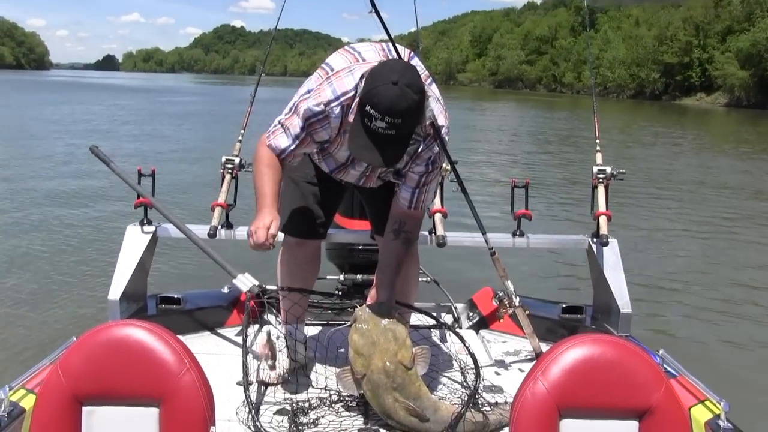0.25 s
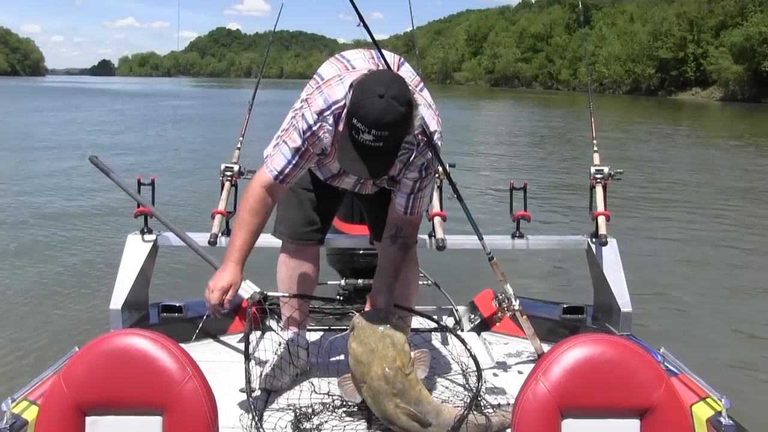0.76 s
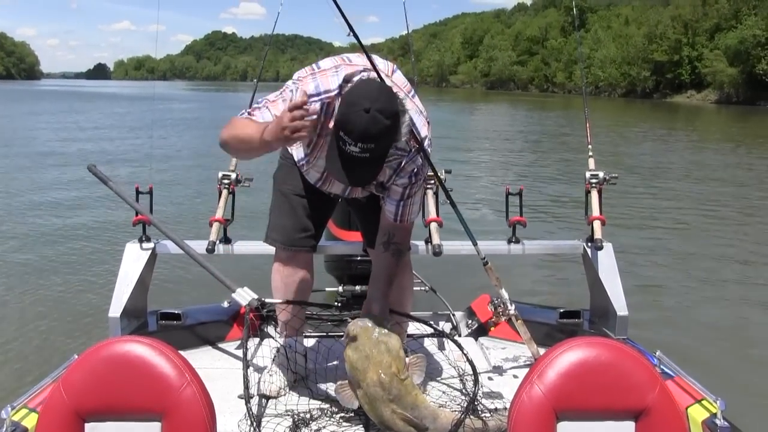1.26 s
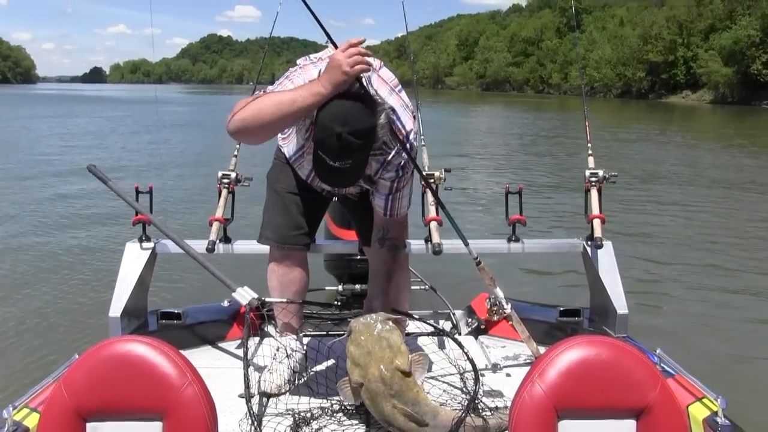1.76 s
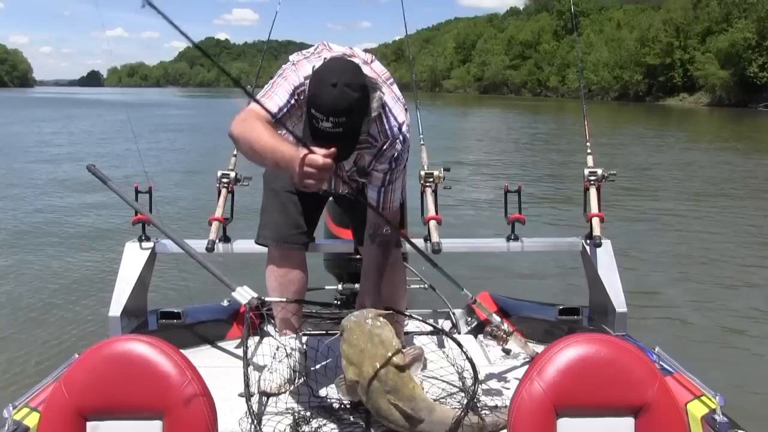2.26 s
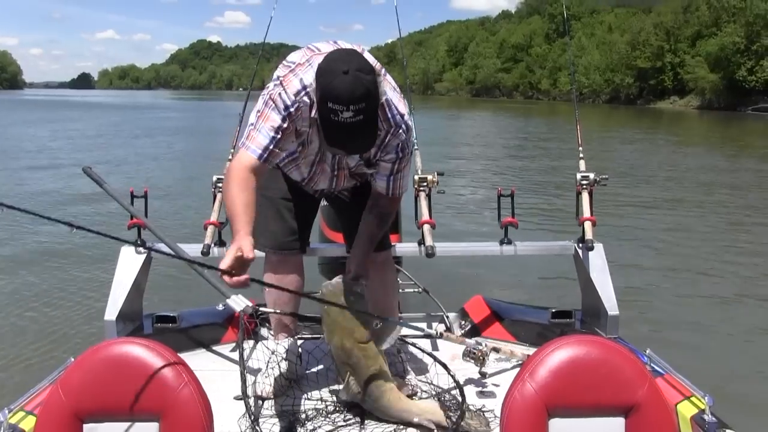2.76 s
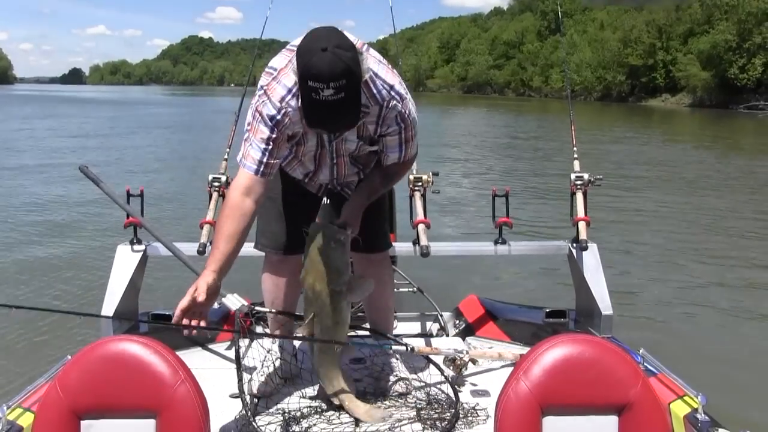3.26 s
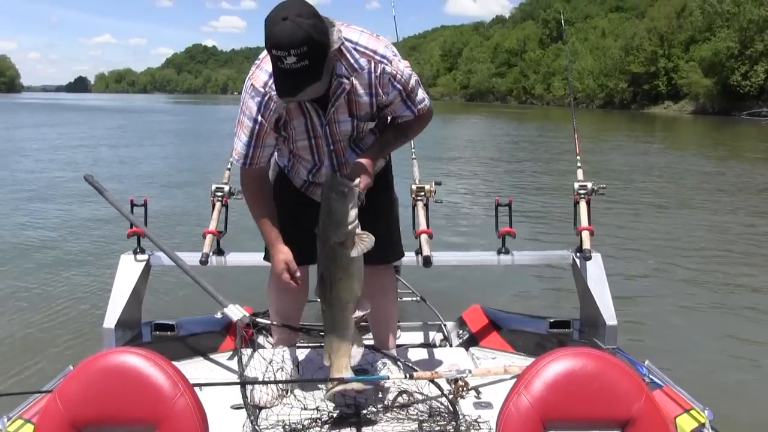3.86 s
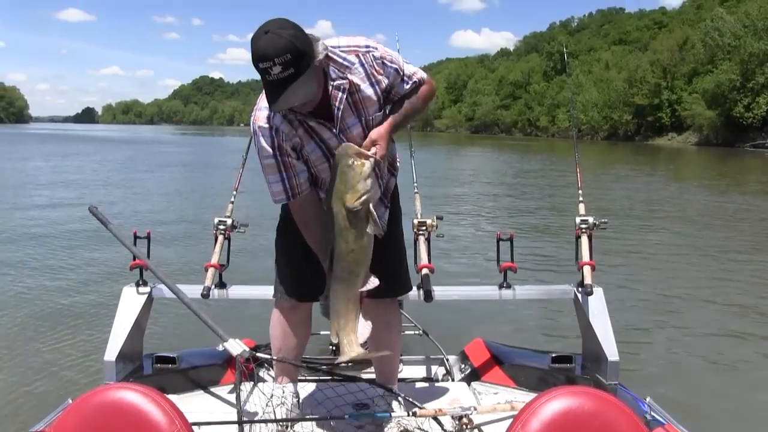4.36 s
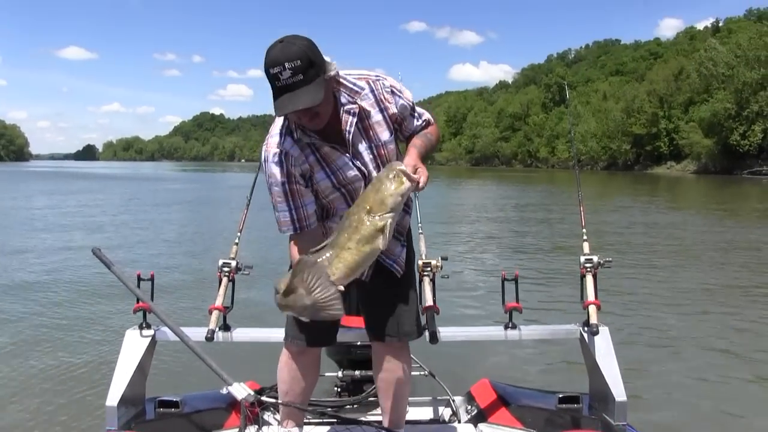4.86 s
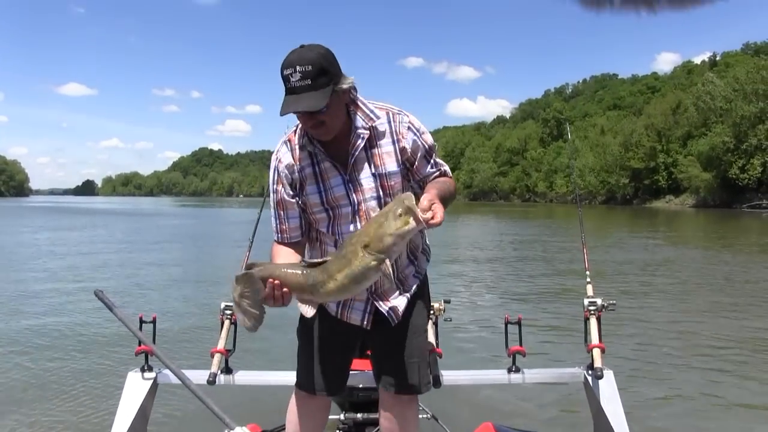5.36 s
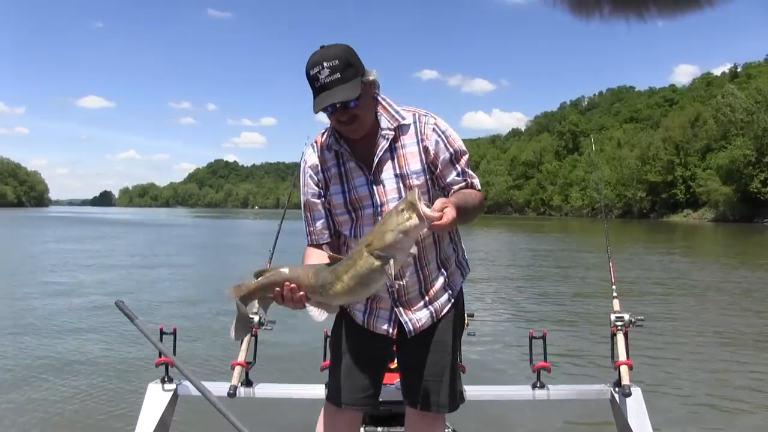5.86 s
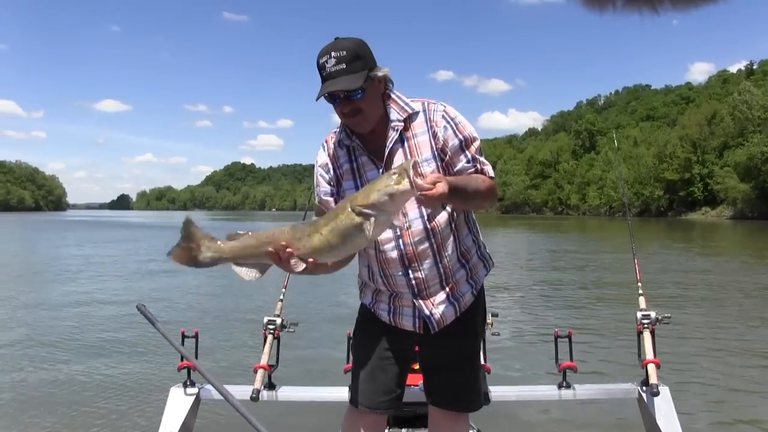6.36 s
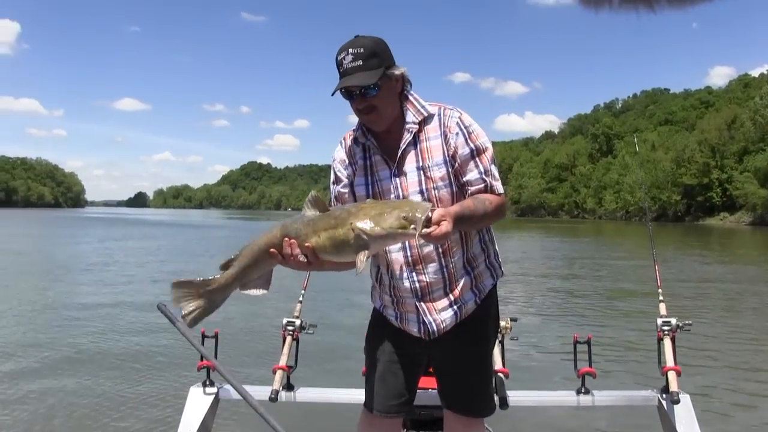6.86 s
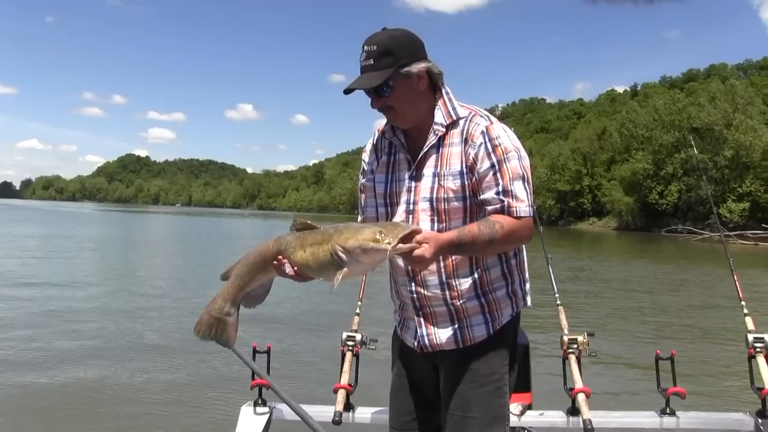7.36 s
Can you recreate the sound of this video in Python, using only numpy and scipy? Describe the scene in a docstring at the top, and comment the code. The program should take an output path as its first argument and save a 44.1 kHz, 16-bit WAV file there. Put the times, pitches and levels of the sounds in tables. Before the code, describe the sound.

On a small boat, a steel tool clinks down, a rod butt knocks and scrapes, and a net hoop clacks over lapping water and birdsong.

```python
"""River wash and far twitter come first, then a steel tool clinks down on the deck of a small boat.
An angler clears the deck and lifts a catfish out of the net: a rod butt knocks and scrapes out of its
holder, the net's hoop clacks, its mesh rustles. Songbirds call from the wooded bank; wind buffets.
Blows are decaying sine modes plus banded noise; birds are swept sines with an echo tail; river, wind,
mesh and scrape are coloured noise with fluctuating level."""
import sys
import numpy as np
from scipy import signal
from scipy.fft import rfft, irfft, next_fast_len
from scipy.io import wavfile
from scipy.ndimage import uniform_filter1d, map_coordinates

SR = 44100
rng = np.random.default_rng(int(sys.argv[2]) if len(sys.argv) > 2 else 0)


def generate_wav(sig):
    """Save sig (samples, or channels by samples) to the path in sys.argv[1] as 16-bit PCM at SR."""
    pcm = np.round(np.clip(np.atleast_2d(sig).T, -1, 1) * 32767).astype(np.int16)
    wavfile.write(sys.argv[1], SR, pcm)


N = 335711


def amp(db):
    """Decibels to gain."""
    return 10 ** (np.asarray(db) / 20)


def unit(x):
    """Scaled to rms 1."""
    return x / np.sqrt(np.mean(x ** 2) + 1e-20)


def along(points, hz):
    """Values of (f/Hz, value) points, interpolated on a log frequency axis."""
    f, v = np.transpose(points)
    return np.interp(np.log(hz + 1), np.log(f + 1), v)


def level(rows):
    """Gain per sample from (t/s, level/dB) rows, -120 dB outside them."""
    return amp(np.interp(np.arange(N) / SR, *np.transpose(rows), left=-120, right=-120))


def wobble(knots_per_s, size=N):
    """Smooth random curve through normally distributed knots."""
    knots = rng.standard_normal(int(size * knots_per_s / SR) + 4)
    return map_coordinates(knots, [np.arange(size) * knots_per_s / SR])


def filtered(x, response):
    """x times a response of frequency."""
    n = x.shape[-1]
    m = next_fast_len(n + 8192)
    return irfft(rfft(x, m) * response(np.fft.rfftfreq(m, 1 / SR)), m)[..., :n]


def noise(colour, size=N):
    """Two independent noises of the given colour, rms 1 over the pair."""
    white = rng.standard_normal((2, size))
    return unit(filtered(white, lambda hz: amp(along(colour, hz))))


def stereo(pair, side_db):
    """Left and right from a middle and a side signal."""
    mid, side = pair[0], amp(side_db) * pair[1]
    return np.array([mid + side, mid - side])


def add(track, start_s, sound):
    """Mix a sound into the track, cut at the track's end."""
    part = track[:, round(start_s * SR):][:, :sound.shape[1]]
    part += sound[:, :part.shape[1]]


def swells(rows, attack_s, sag_db_per_s, release_s):
    """Gain per sample of (t, length, level) rows: rise, steady sag, then a release with t60 release_s."""
    gain = np.zeros(N)
    for start_s, length_s, db in rows:
        t = np.maximum(np.arange(N) / SR - start_s, 0)
        release_db = 60 * np.maximum(t - length_s, 0) / release_s
        gain += np.minimum(t / attack_s, 1) * amp(db - sag_db_per_s * t - release_db)
    return gain


def dying(x, decay, stretch=1):
    """Seven bands of x each swell quickly and die with their own t60 times stretch."""
    t = np.arange(x.shape[1]) / SR
    hz, spectrum = np.fft.rfftfreq(len(t), 1 / SR), rfft(x)
    centres = np.geomspace(100, 14000, 7)
    out = np.zeros_like(x)
    for centre, weights in zip(centres, np.eye(len(centres))):
        band = irfft(spectrum * along(np.c_[centres, weights], hz), len(t))
        onset = 1 - np.exp(-2 * t * min(centre, SR / 20))
        out += band * amp(-60 * t / (stretch * along(decay, centre))) * onset
    return out


# river colour: f/Hz, level/dB
RIVER_COLOUR = [(13, -39), (22, -21.5), (59, 1), (128, -2.5), (174, -8), (211, -4), (229, -4.5), (278, -9),
                (524, -13.5), (1040, -19), (1860, -24), (4030, -27), (5460, -31), (7190, -33), (16000, -40)]
# left-right correlation: f/Hz, likeness (1 = identical)
RIVER_LIKENESS = [(60, 0.41), (180, 0.8), (550, 0.26), (1650, 0.47), (4970, 0.56), (15000, 0.5)]


def river(gain_db, lap_db, hiss_db):
    """Ripples and far leaves: hiss above a lapping low wash, each with its own level fluctuation."""
    pair = noise(RIVER_COLOUR)
    low = filtered(pair, lambda hz: 1 / (1 + (hz / 450) ** 4))
    hiss = (pair - low) * amp(hiss_db * wobble(5))
    pair = hiss + low * amp(lap_db * wobble(14))

    def mid_side(hz):
        # cos^2 - sin^2 of this angle equals the likeness
        angle = np.arccos(np.clip(along(RIVER_LIKENESS, hz), -1, 1)) / 2
        return np.array([np.cos(angle), np.sin(angle)])

    return amp(gain_db) * stereo(filtered(pair, mid_side), 0)


# gusts at the microphone, before gain: t/s, length/s, level/dB
GUST_ROWS = [(3.46, 0.66, -46.5), (4.55, 0.81, -42), (5.75, 0.033, -41), (5.91, 0.035, -35),
             (6.04, 0.49, -33.5), (6.77, 0.09, -43.5), (6.87, 0.48, -36.5), (7.57, .05, -48)]
# buffeting colour: f/Hz, level/dB
BUFFET_COLOUR = [(13, -37), (22, -24), (76, 0), (119, -1), (255, -18.5), (331, -29), (468, -61), (508, -55),
                 (600, -50), (780, -73), (1320, -120)]
GUST_ATTACK_S, GUST_SAG_DB_PER_S, GUST_RELEASE_T60_S, LULL_DB = 0.01, 11.5, 0.34, -56


def wind(gain_db, lump_db, left_db, side_db):
    """Eddies buffet the microphone: lumpy low noise, louder left, with a lull floor from the first gust on."""
    eddies = unit(noise(BUFFET_COLOUR) * amp(lump_db * wobble(30)))
    lull = amp(LULL_DB) * (np.arange(N) / SR > GUST_ROWS[0][0])
    strength = lull + swells(GUST_ROWS, GUST_ATTACK_S, GUST_SAG_DB_PER_S, GUST_RELEASE_T60_S)
    balance_db = np.array([[left_db], [-left_db]])
    return stereo(eddies, side_db) * strength * amp(gain_db + balance_db)


def chorus(gain_db, patchy_db):
    """Far birds blur into twitter: noise with random time-frequency patches of level."""
    # f/Hz, level/dB
    colour = [(1500, -27.5), (2600, 6.5), (4200, -15.0), (5500, -14), (7300, -7), (9000, -24)]
    _, _, z = signal.stft(noise(colour), SR, nperseg=512)
    field = uniform_filter1d(rng.standard_normal(z.shape[1:]), size=5, axis=0)
    field = uniform_filter1d(field, size=14, axis=1)
    twitter = signal.istft(z * amp(patchy_db * unit(field)), nperseg=512)[1][:, :N]
    return amp(gain_db) * stereo(unit(twitter), -12.5)


QUAVER_AT_5KHZ = 0.0194  # random pitch swing as a share of pitch; grows with pitch


def notes(rows, depth, bend, flutter_db, rising=False):
    """Sines sweep depth (share of top pitch) up or down; bend > 1 lingers near the top; higher quavers more."""
    track = np.zeros((2, N))
    for start_s, length_s, top_hz, db in rows:
        u = np.linspace(0, 1, int(length_s * SR))
        below_top = 1 - u if rising else u
        quaver = QUAVER_AT_5KHZ * top_hz / 5000 * wobble(450, len(u))
        pitch_hz = top_hz * (1 - depth * below_top ** bend) * (1 + quaver)
        swell = signal.windows.tukey(len(u), .25) * amp(db + flutter_db * wobble(140, len(u)))
        tone = swell * np.sin(2 * np.pi * np.cumsum(pitch_hz) / SR)
        add(track, start_s, np.tile(tone, (2, 1)))
    return track


# songbird slurs up to a top pitch, before gain: t/s, length/s, top f/Hz, level/dB
RISING_SLURS = [(.73, .03, 2500, -64), (4.905, 0.052, 5270, -48.5), (5.43, 0.048, 5500, -51),
                (5.598, .045, 6150, -51), (5.88, 0.059, 5550, -48.5), (6.105, .125, 6040, -48.5),
                (6.36, .14, 6180, -47.5), (7.505, 0.046, 5250, -50)]
# songbird slurs down from a top pitch, before gain: t/s, length/s, top f/Hz, level/dB
FALLING_SLURS = [(2.894, 0.042, 4260, -50), (4.832, 0.051, 4430, -53), (5.02, 0.097, 4780, -54),
                 (5.15, 0.078, 3095, -54.5), (5.34, .05, 4700, -52), (5.555, 0.1, 7470, -55),
                 (5.56, 0.079, 4750, -53), (5.625, 0.036, 5500, -47.5), (5.786, 0.062, 8000, -51),
                 (5.908, 0.038, 5130, -51), (6.044, 0.035, 5170, -46), (6.301, 0.037, 5180, -46),
                 (6.585, .125, 5500, -46), (7.407, 0.076, 4580, -57), (7.516, 0.039, 4270, -59)]
# nearly level whistled notes, some low, before gain: t/s, length/s, top f/Hz, level/dB
WHISTLE_NOTES = [(4.0, 0.123, 3500, -53.5), (4.745, .04, 4240, -56), (5.26, 0.041, 4270, -53),
                 (5.57, 0.2, 1810, -62), (5.645, 0.057, 4500, -54), (6.22, .12, 1770, -63),
                 (6.72, .17, 1796, -66)]
RISE_DEPTH, RISE_BEND = 0.28, 3
FALL_DEPTH, FALL_BEND = .3, 1.5
WHISTLE_SAG = .025  # share of pitch lost


def birds(gain_db, flutter_db):
    """Rising and falling slurs, plus whistled notes that sag slightly in pitch."""
    slurs = notes(RISING_SLURS, RISE_DEPTH, RISE_BEND, flutter_db, rising=True)
    slurs += notes(FALLING_SLURS, FALL_DEPTH, FALL_BEND, flutter_db)
    return amp(gain_db) * (slurs + notes(WHISTLE_NOTES, WHISTLE_SAG, 1, flutter_db))


# echo decay before stretch: f/Hz, t60/s
BANK_T60 = [(500, 0.65), (4000, 0.84), (9000, 0.3)]


def bank(x, stretch):
    """Trees on the bank scatter a soft tail: convolution with dying noise."""
    tail = stereo(dying(rng.standard_normal((2, SR)), BANK_T60, stretch), -1.52)
    return signal.fftconvolve(x, tail / np.linalg.norm(tail[0]), axes=1)[:, :N]


# pulls on the wet mesh and the fish's skin, before gain: t/s, length/s, level/dB
MESH_PULLS = [(1.93, 0.043, -57.5), (3.46, .28, -52), (4.52, 0.069, -49), (4.68, 0.32, -59.5),
              (5.1, .22, -67), (6.38, 0.046, -57)]
# rustle colour: f/Hz, level/dB
MESH_SPECTRUM = [(500, 3), (2000, 0.5), (7000, -1), (10000, -6.5), (15000, -4.5)]
PULL_ATTACK_S, PULL_SAG_DB_PER_S, PULL_RELEASE_T60_S = 0.01, 12, 0.3


def mesh(gain_db, clump_db, grain_db):
    """Wet netting slips over the fish: noise with slow clumps and fast grains of level."""
    grains = unit(noise(MESH_SPECTRUM) * amp(clump_db * wobble(45) + grain_db * wobble(830)))
    pulls = swells(MESH_PULLS, PULL_ATTACK_S, PULL_SAG_DB_PER_S, PULL_RELEASE_T60_S)
    return amp(gain_db) * pulls * stereo(grains, -4.5)


# small taps of tackle, and the sharp crack of the rod butt's hardest knock, before gain:
# t/s, level/dB, centre f/Hz, t60/s
TAPS_AND_CRACK = [(0.566, -46, 1324, .038), (.648, -28.5, 1040, 0.044), (1.316, -40, 970, 0.023),
                  (1.363, -44, 960, 0.11), (1.398, -48, 3470, .03), (1.582, -24, 1050, 0.013),
                  (1.824, -41, 1000, 0.057), (2.042, -41, 1660, 0.053), (2.261, -26, 11000, 0.02),
                  (3.467, -40, 5000, 0.12), (3.831, -31, 895, 0.027), (4.347, -36, 4190, 0.02),
                  (5.279, -39.5, 2920, .046), (5.523, -37, 2650, 0.013), (5.718, -39, 1140, 0.021),
                  (5.821, -38, 1010, 0.048)]
TAP_OCTAVES_AT_1KHZ, TAP_WIDENING_POWER = 0.37, 1


def taps(gain_db, side_db):
    """Taps and a crack: quickly damped noise humps, broader in octaves the higher they lie."""
    track, t = np.zeros((2, N)), np.arange(SR // 6) / SR
    for start_s, db, centre_hz, t60_s in TAPS_AND_CRACK:
        octaves = TAP_OCTAVES_AT_1KHZ * (centre_hz / 1000) ** TAP_WIDENING_POWER

        def hump(hz):
            return 1 / (1 + (np.log2((hz + 1) / centre_hz) / octaves) ** 2) ** 1.45

        tap = unit(filtered(rng.standard_normal((2, len(t))), hump))
        tap *= amp(-60 * t / t60_s) * (1 - np.exp(-t / 0.00029))
        add(track, start_s, amp(db + gain_db) * stereo(tap, side_db))
    return track


# butt slides out of the holder, before gain: t/s, level/dB
SCRAPE_LEVEL = [(2.32, -34.5), (2.39, -52), (2.43, -38.5), (2.47, -43.5), (2.52, -36), (2.565, -33),
                (2.60, -56)]
# scrape colour: f/Hz, level/dB
SCRAPE_SPECTRUM = [(100, -22), (250, -5), (420, 2.5), (650, 1), (1050, -7.5), (1700, -21.5), (2800, -19),
                   (8000, -42)]


def scrape(gain_db, slip_db):
    """The rod's grip sticks and slips along the holder's tube: noise with rapid random level."""
    slips = unit(noise(SCRAPE_SPECTRUM) * amp(slip_db * wobble(220)))
    return amp(gain_db) * level(SCRAPE_LEVEL) * stereo(slips, -10)


# clatter decay before stretch: f/Hz, t60/s
HULL_T60 = [(100, 0.22), (400, 0.1), (1000, 0.067), (3000, 0.068), (7000, 0.041), (15000, 0.049)]


def struck(hits, modes, colour, stretch, ring_db, heft, chatter_db, spread_hz, side_db, gain_db):
    """Every blow rings the object's own modes and a dense, short clatter of the hull."""
    track, t = np.zeros((2, N)), np.arange(SR // 3) / SR
    mode_hz, mode_db, t60_s = np.transpose(modes)[:, :, None]
    heaviest_db = max(hit[1] for hit in hits)
    for start_s, db, bright_db in hits:
        # brightness tilt: more dB per octave sounds brighter
        tilted = [(hz, d + bright_db * np.log2(hz)) for hz, d in colour]
        # loose parts chatter while the blow dies away
        clatter = dying(noise(tilted, len(t)), HULL_T60, stretch)
        clatter = clatter * amp(chatter_db * wobble(531, len(t)))
        scatter_db = 2 * rng.standard_normal(mode_hz.shape)
        strength = amp(mode_db + bright_db * np.log2(mode_hz) + scatter_db)
        phase = rng.uniform(0, 2 * np.pi, (2, len(modes), 1))
        # shifting contact: phase random walk widens each mode's line
        walk = np.cumsum(rng.standard_normal((len(modes), len(t))), axis=1)
        phase = phase + walk * np.sqrt(2 * np.pi * abs(spread_hz) / SR)
        partials = strength * amp(-60 * t / t60_s) * np.sin(2 * np.pi * mode_hz * t + phase)
        ring = np.sum(partials, axis=1)
        ring *= np.sqrt(2) / np.linalg.norm(strength) * (1 - np.exp(-t * mode_hz.min()))
        # heft: dB of extra ring per dB of blow
        ring *= amp(ring_db + heft * (db - heaviest_db))
        add(track, start_s, amp(db + gain_db) * stereo(clatter + ring, side_db))
    return track


# feet, rod and the fish's tail on the deck, before gain: t/s, level/dB
THUMP_HITS = [(.565, -38), (.648, -33.5), (2.263, -19.5), (3.37, -33.5), (3.47, -28), (3.53, -28),
              (3.67, -17), (3.723, -20.5), (3.747, -24.5), (3.795, -25.5), (3.834, -24.5), (3.983, -28.5),
              (4.26, -35), (4.468, -16), (4.54, -19.5), (4.589, -26), (4.69, -28)]
# deck modes: f/Hz, level/dB, t60/s
THUMP_MODES = [(126, 2, 0.086), (198.8, -2, 0.312), (225.3, -9.5, 0.22), (343, -6.5, 0.24)]
# thump colour before tilt: f/Hz, level/dB
THUMP_COLOUR = [(50, -4), (110, 0), (250, 4.5), (450, -4.5), (900, -8.5), (2000, -22), (6000, -29),
                (16000, -50)]
THUMP_BRIGHT_DB_PER_OCTAVE = 1


def thumps():
    """Blows ring the low modes of the deck, all with one brightness."""
    hits = [(start_s, db, THUMP_BRIGHT_DB_PER_OCTAVE) for start_s, db in THUMP_HITS]
    return struck(hits, THUMP_MODES, THUMP_COLOUR, stretch=1.31, ring_db=0.5, heft=0,
                  chatter_db=2, spread_hz=10.2, side_db=-15, gain_db=-6.5)


# hoop clacks, before gain: t/s, level/dB, brightness/(dB/octave), gap to second contact/s, its rel. level/dB
HOOP_CLACKS = [(3.56, -7.5, -1.5, .007, 1.5), (3.59, -8, 0.5, 0.026, 0), (3.758, -9.5, 2.5, 0.026, -12.5),
               (3.922, -14.5, 1, 0.018, -9), (4.442, -1.5, 5, .007, -11), (4.472, -7, 2.5, .022, -2.5),
               (4.637, -18.5, -3, 0.0061, 0), (4.652, -18, -5, .014, 2.5)]
# hoop modes: f/Hz, level/dB, t60/s
HOOP_MODES = [(868, -6.5, 0.26), (1270, -5, 0.19), (1630, -10.5, 0.21), (1892, 8, 0.09), (2426, -3.5, .13),
              (2750, 2, 0.087), (3174, 6, 0.076), (3620, -18, 0.035), (4146, 9, 0.036), (3990, 6.5, 0.015),
              (4300, 9.5, 0.039), (5550, -5, 0.028), (7650, -8, 0.051)]
# clack colour before tilt: f/Hz, level/dB
HOOP_COLOUR = [(53, -27), (90, -12), (210, -11), (753, -8.5), (1240, -7.5), (1410, -9.5), (1910, -3),
               (2180, -5.5), (2830, -2), (3430, -9), (4260, -1), (5650, -17), (7820, -23.5), (9720, -34),
               (16000, -42.5)]
DULLING_PER_DB = 0.63  # dB/octave of brightness lost per dB the second contact is weaker


def net_frame():
    """The net's hoop lands one side, then the other; a weaker second contact is duller."""
    hits = []
    for start_s, db, bright_db, gap_s, second_db in HOOP_CLACKS:
        hits.append((start_s, db, bright_db))
        hits.append((start_s + gap_s, db + second_db, bright_db + DULLING_PER_DB * second_db))
    return struck(hits, HOOP_MODES, HOOP_COLOUR, stretch=1.05, ring_db=-1.5, heft=0,
                  chatter_db=0.0, spread_hz=28.6, side_db=-11.5, gain_db=-7.0)


# rod butt knocks, before gain: t/s, level/dB, brightness/(dB/octave)
ROD_HITS = [(2.235, -23.5, 5), (2.2605, -3.5, 1), (2.318, -9.5, -0.5), (2.330, -14, -2.5),
            (2.345, -11.5, 0.5), (2.410, -13.5, -1.5), (2.487, -15, -1.5), (2.4915, -9.5, 1),
            (2.531, -15.5, -1), (2.535, -12, -0.5), (2.553, -20, -3)]
# butt and holder modes: f/Hz, level/dB, t60/s
ROD_MODES = [(390, 9, 0.052), (470, -19, 0.099), (680, -33, 0.063), (826, -10, .04), (914, -5, 0.032),
             (1348, -6, 0.036), (2730, -33, 0.014), (5140, -42, .11)]
# knock colour before tilt: f/Hz, level/dB
ROD_COLOUR = [(50, -39), (90, -17.5), (260, -15), (385, -5.5), (640, -12), (880, -7), (1310, -11.5),
              (1690, -19), (2350, -19), (2750, -15.5), (3200, -29.5), (4400, -31), (6500, -44),
              (16000, -73.5)]


def rod_butt():
    """The butt knocks in its holder; heavier blows ring relatively more."""
    return struck(ROD_HITS, ROD_MODES, ROD_COLOUR, stretch=0.78, ring_db=9.5, heft=0.98,
                  chatter_db=0.5, spread_hz=5.8, side_db=-12.5, gain_db=-8.0)


# steel tool landing, before gain: t/s, level/dB, brightness/(dB/octave)
STEEL_HITS = [(1.1892, -1, 1.5), (1.4162, -9.5, 1), (1.4287, -16.5, 1.5), (1.4922, -23, -1.5)]
# tool modes: f/Hz, level/dB, t60/s
STEEL_MODES = [(3920, 0, 0.16), (6300, -15, 0.074), (10200, -13, .085), (11120, -10, 0.075)]
# clink colour before tilt: f/Hz, level/dB
STEEL_COLOUR = [(90, -27), (250, 2.5), (400, -13), (760, 2), (1000, -9.5), (1330, -3.5), (1600, -11.5),
                (2150, -16), (2850, -4), (3800, -2.5), (5790, -7.5), (6640, -17), (7920, -11.5),
                (16000, -39.5)]


def steel_tool():
    """The tool clinks down: high steel modes, faint beside the clatter."""
    return struck(STEEL_HITS, STEEL_MODES, STEEL_COLOUR, stretch=0.73, ring_db=-20.5, heft=-0.11,
                  chatter_db=1.5, spread_hz=6.8, side_db=-10.0, gain_db=-11.5)


def scene():
    """Water, wind, birds on the bank and handling on deck."""
    air = river(gain_db=-47.5, lap_db=1.85, hiss_db=1.0)
    air += wind(gain_db=0.4, lump_db=2.5, left_db=2.4, side_db=0.5)
    air += chorus(gain_db=-69.5, patchy_db=5.0)
    song = birds(gain_db=-2.5, flutter_db=3.0)
    rustle = mesh(gain_db=2.5, clump_db=4, grain_db=4.0)
    deck = taps(gain_db=0.5, side_db=-7.5) + scrape(gain_db=0.5, slip_db=0.5)
    deck += thumps() + net_frame() + rod_butt() + steel_tool()
    # birds sit deep in the trees: mostly echo
    echoes = amp(-29) * bank(deck, stretch=1.6) + amp(1.5) * bank(song, stretch=1.0)
    return air + song + rustle + deck + echoes


CEILING, TOP_HZ = .95, 15900


def record(dry):
    """Peaks round off smoothly towards CEILING, then everything from TOP_HZ up is removed."""
    rounded = dry / (1 + np.abs(dry / CEILING) ** 6) ** (1 / 6)
    return filtered(rounded, lambda hz: hz < TOP_HZ)


dry = scene()
out = record(dry)
generate_wav(out)
```